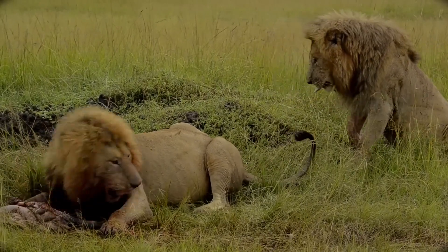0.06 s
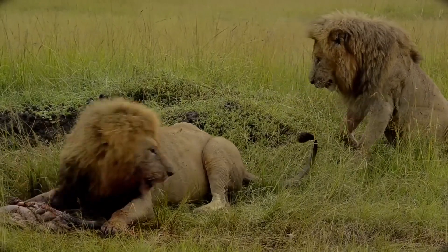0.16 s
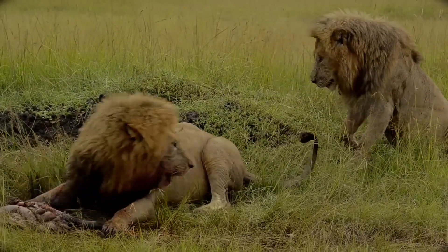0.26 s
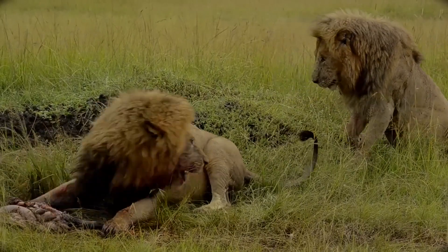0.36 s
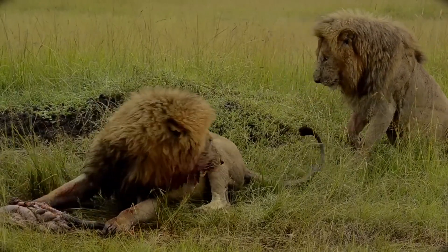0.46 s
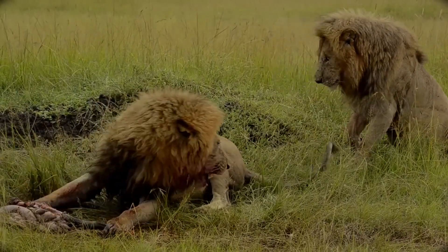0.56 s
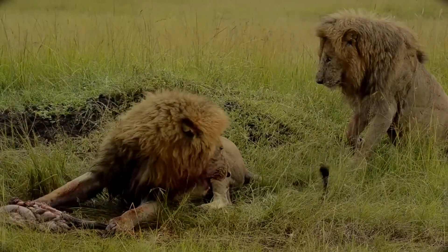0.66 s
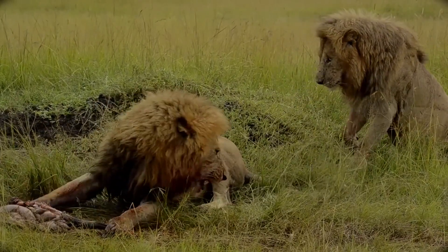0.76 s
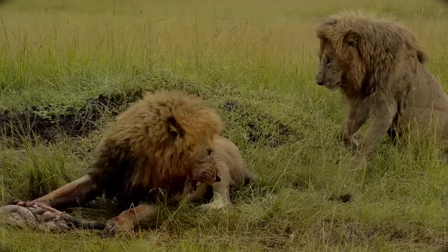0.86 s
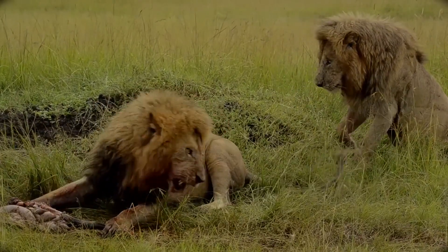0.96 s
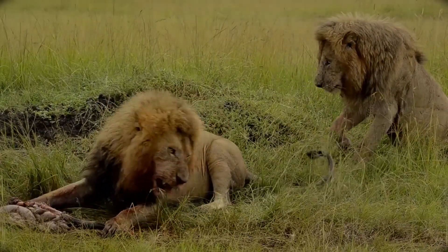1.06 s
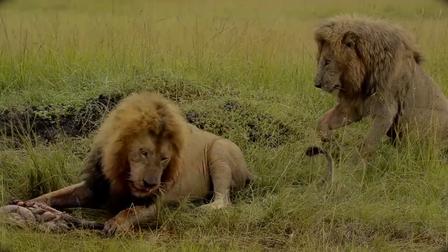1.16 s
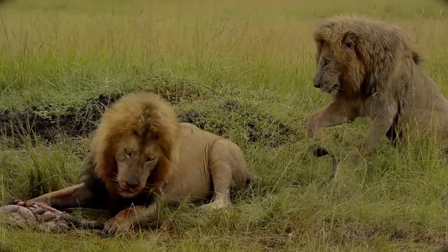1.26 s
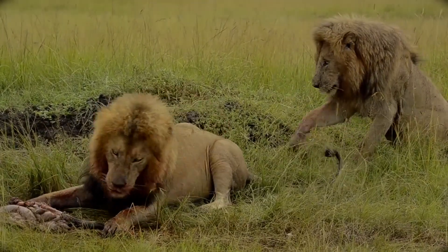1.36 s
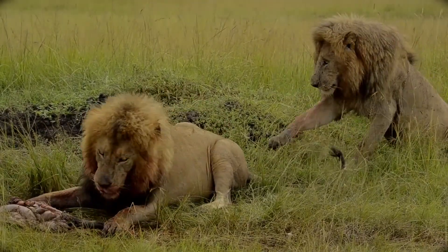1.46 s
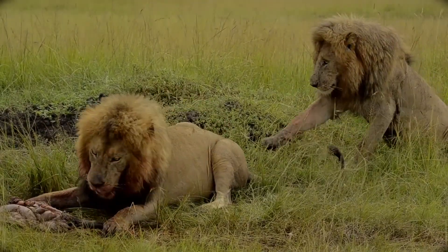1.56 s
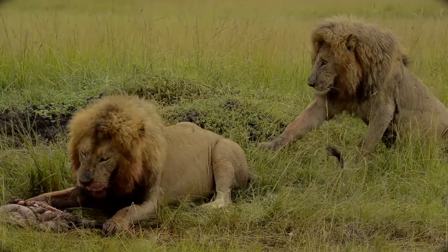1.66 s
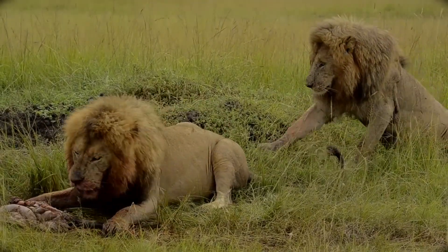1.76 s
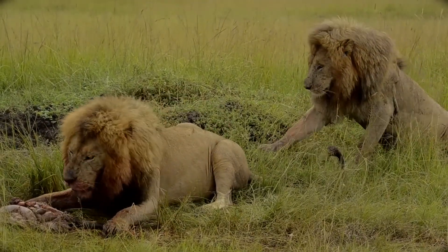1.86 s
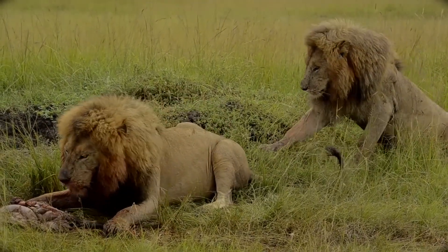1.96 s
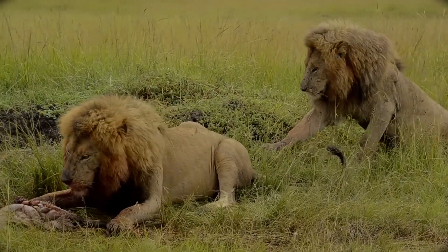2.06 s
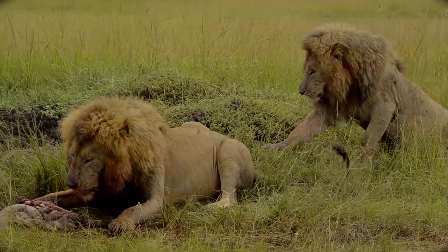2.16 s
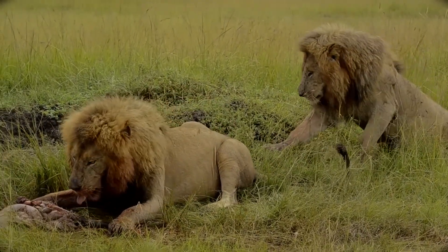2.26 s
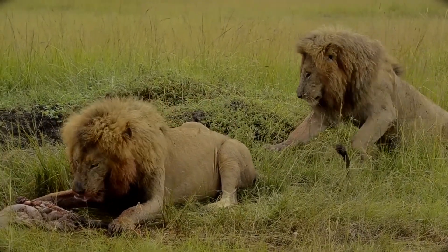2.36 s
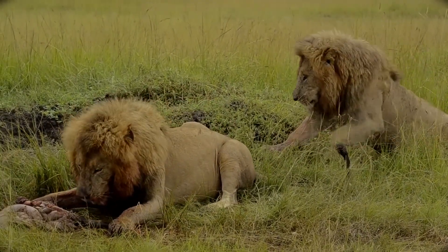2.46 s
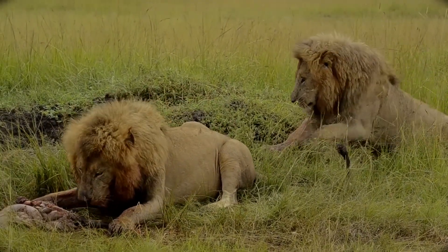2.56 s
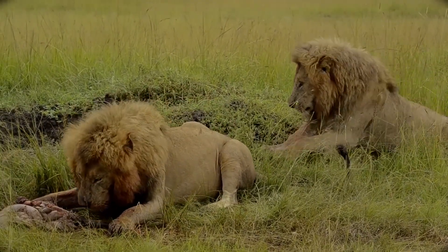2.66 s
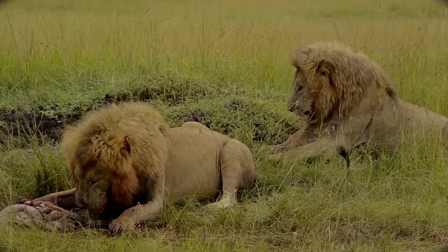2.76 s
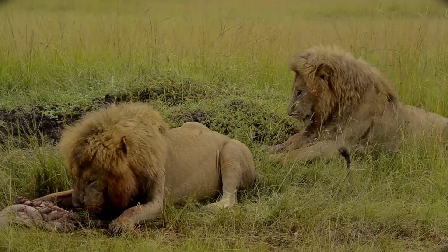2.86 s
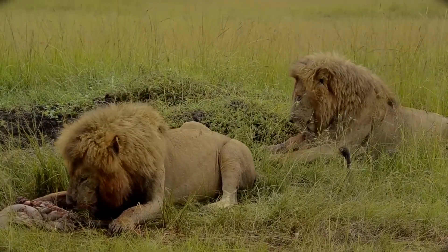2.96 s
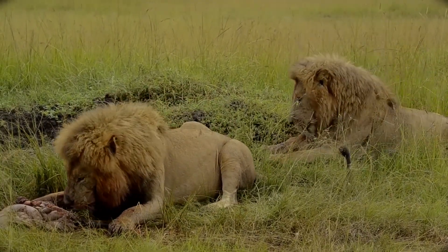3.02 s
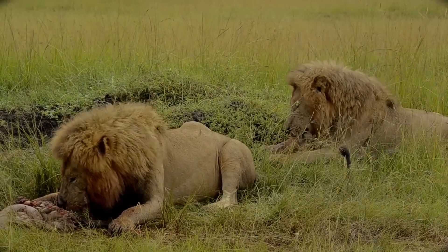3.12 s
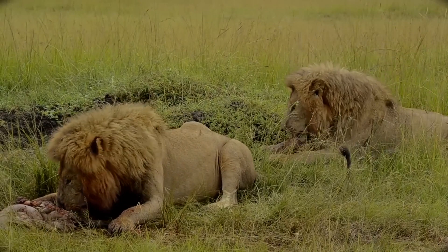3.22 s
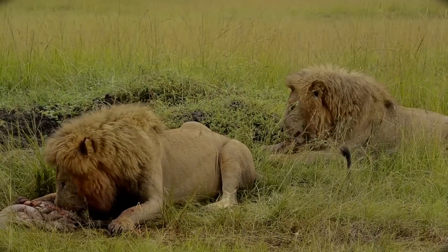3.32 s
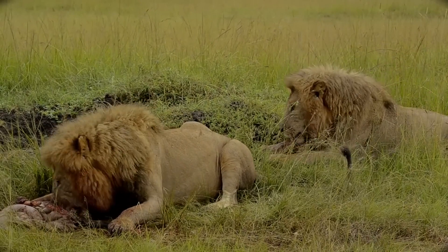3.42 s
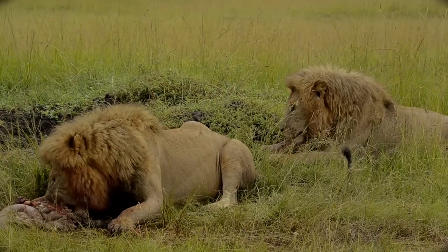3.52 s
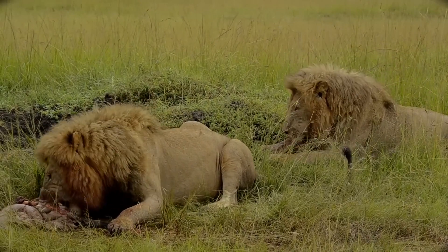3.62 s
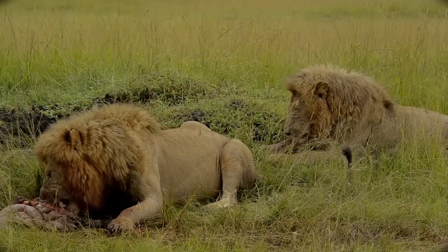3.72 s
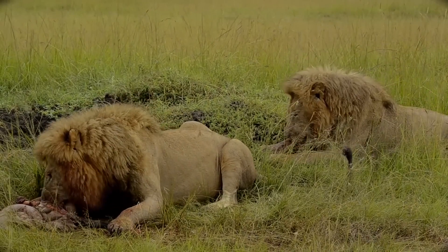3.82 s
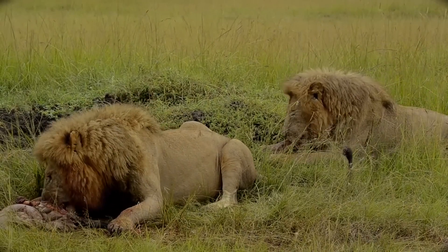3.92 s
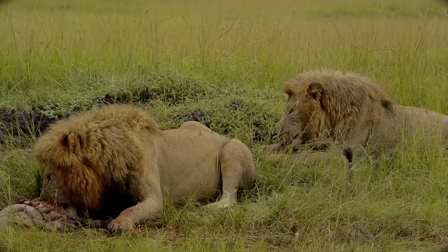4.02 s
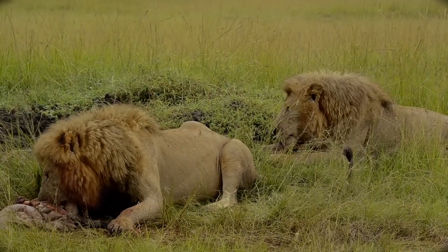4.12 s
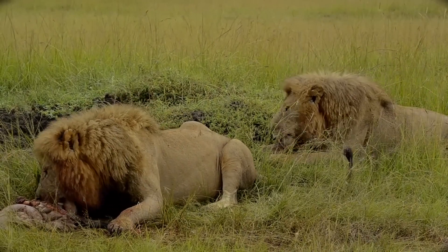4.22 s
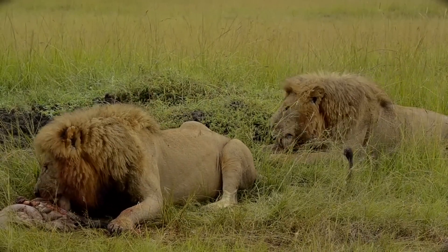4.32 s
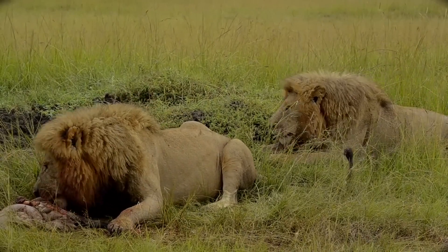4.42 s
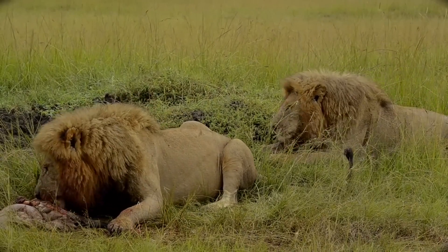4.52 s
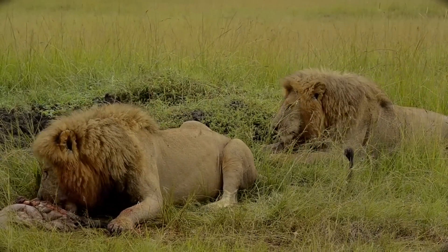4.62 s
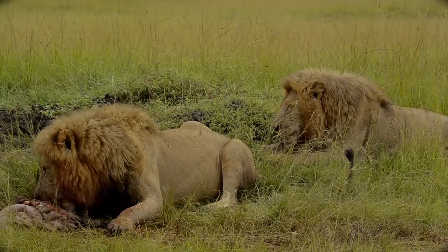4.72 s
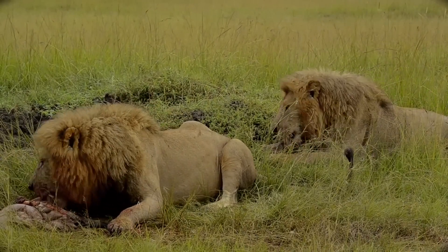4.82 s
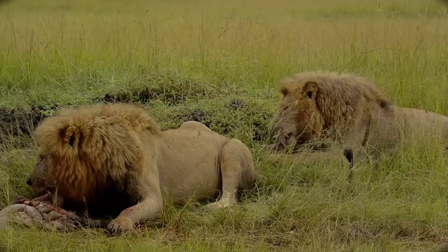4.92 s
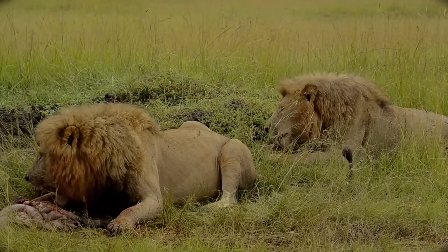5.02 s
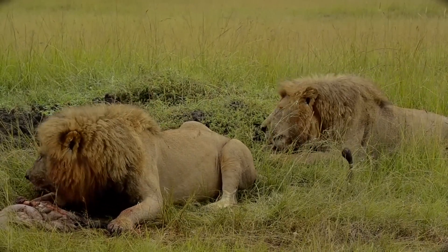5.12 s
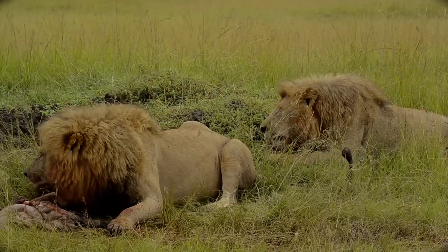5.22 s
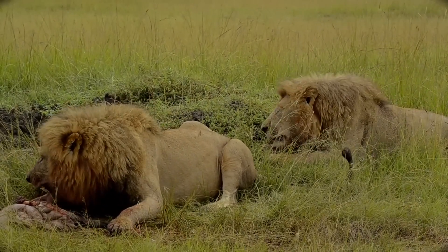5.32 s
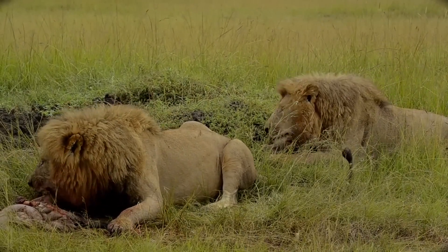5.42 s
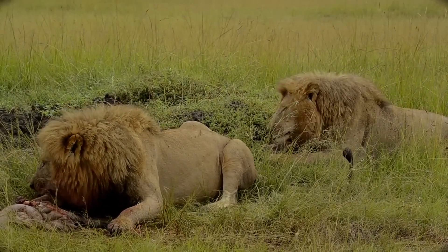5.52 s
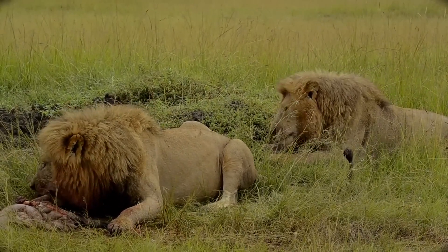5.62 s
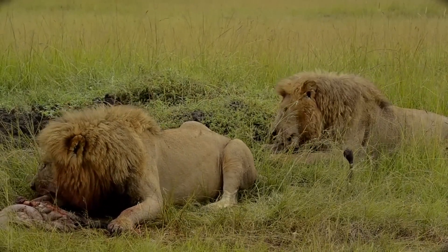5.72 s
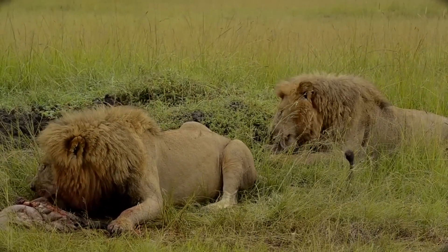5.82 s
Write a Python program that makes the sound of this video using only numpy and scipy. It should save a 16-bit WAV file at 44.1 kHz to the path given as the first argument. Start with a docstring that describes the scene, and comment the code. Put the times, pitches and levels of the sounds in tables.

```python
"""A lion growling over its kill

A lion growls in short bursts in open grassland, some metres away. Its slack vocal folds flap about
17 to 32 times a second, and each flap rings the belly, chest, throat, mouth, nose, palate and teeth.
Its breath adds a low, lumpy rumble. Noise bursts are teeth snapping dry tissue; soft thuds are paws,
jaws and tail on grass and meat. Birds are sliding tones and hoarse noise, insects narrow noise bands,
and the distant rustle of grass and trees is shaped noise."""
import sys
import numpy as np
from scipy import signal
from scipy.io import wavfile
from scipy.ndimage import uniform_filter1d

SR = 44100
rng = np.random.default_rng(int(sys.argv[2]) if len(sys.argv) > 2 else 0)


def generate_wav(sig):
    """Save sig (samples, or channels by samples) to the path in sys.argv[1] as 16-bit PCM at SR."""
    pcm = np.round(np.clip(np.atleast_2d(sig).T, -1, 1) * 32767).astype(np.int16)
    wavfile.write(sys.argv[1], SR, pcm)


N = 259308  # samples in the scene

# fixed rings of the palate, for growls and the pant: (pitch_hz, width_hz, relative level_db)
PALATE_RINGS = [(2480, 100, -1), (2700, 100, 0), (3080, 150, -10), (2200, 200, -12)]


def amp(db):
    """Turns decibels into a plain factor."""
    return 10 ** (np.asarray(db) / 20)


def evened(x):
    """Scales a sound to an average (RMS) strength of 1."""
    return x / np.sqrt(np.mean(x ** 2) + 1e-20)


def add(mix, start_s, sound):
    """Lays a sound into the mix at its start time, cutting what runs past the end."""
    part = mix[round(start_s * SR):][:len(sound)]
    part += sound[:len(part)]


def curves(rows, t):
    """Draws straight lines between rows; the first column is time, each other column a curve."""
    times, *columns = np.transpose(rows)
    return [np.interp(t, times, column) for column in columns]


def bouts(rows, t, slope_db_per_s, rest_db):
    """Level in dB: held through each bout, sloping away on both sides down to a resting level."""
    start, end, db = np.transpose(rows)[:, :, None]
    time_outside = np.maximum(np.maximum(start - t, t - end), 0)
    return np.maximum((db - slope_db_per_s * time_outside).max(0), rest_db)


def resonate(x, hz, *widths):
    """A resonance of gain 1: shifts hz down to zero, smooths once for each width, shifts back."""
    turn = np.exp(2j * np.pi * np.cumsum(hz * np.ones(x.shape[-1])) / SR)
    x = x / turn + 1e-18
    for keep in np.exp(-np.pi * np.abs(widths) / SR):
        x = signal.lfilter([1 - keep], [1, -keep], x)
    return 2 * (turn * x).real


def cavity(x, rings, hz=1, soften=6.4):
    """Rings a hollow at several pitches; wider passes soften the onset and darken the valleys."""
    total = 0
    for k, (pitch, width, db) in enumerate(rings):
        ring = resonate(x, pitch * hz, width, soften * width, 2 * soften * width)
        total = total + (-1) ** k * amp(db) * ring  # every second ring is flipped
    return total


def air():
    """Distant rustle of grass and trees: noise with a set tone colour, in drifting patches."""
    # tone colour of the rustle: (pitch_hz, relative level_db)
    colour = [(15, -36.5), (25, -5.5), (104, -7), (204, -6.5), (339, -4.5), (469, -6.5), (581, -7.5),
              (894, -6), (1140, -7.5), (1750, -7), (1950, -14), (2290, -12.5), (5560, -23), (8790, -29),
              (15500, -40.5)]
    frames, hz = N // 256 + 5, np.fft.rfftfreq(1024, 1 / SR)
    real, imaginary, patches = rng.standard_normal((frames, 513, 3)).T
    patches = uniform_filter1d(patches, 12, 0)  # smooth across pitch
    patches = evened(uniform_filter1d(patches, 10, 1))  # smooth along time
    colour_hz, colour_db = np.transpose(colour)
    level_db = np.interp(np.log(hz + 1), np.log(colour_hz + 1), colour_db)[:, None]
    spectrum = (real + 1j * imaginary) * amp(level_db + 1.8 * patches)
    rustle = signal.istft(spectrum, nperseg=1024, noverlap=768)[1][:N]
    return amp(-60.5) * evened(rustle)


def insects():
    """Narrow bands cut from one noise: some steady, one that sings in bouts."""
    # steady insects: (pitch_hz, width_hz, level_db)
    steady = [(1778, 49, -77.5), (4240, 44, -84), (6310, 114, -85.5), (6540, 200, -85.5),
              (7140, 86.5, -88.5), (8510, 370, -87)]
    # bouts of the singing insect: (start_s, end_s, level_db)
    buzz = [(.26, 1.1, -80.5), (1.9, 2.25, -82.5), (2.7, 3.25, -80), (3.7, 3.98, -80.5),
            (4.28, 4.42, -81.5), (4.75, 5.1, -84)]
    hiss = rng.standard_normal(N)
    level_db = bouts(buzz, np.arange(N) / SR, slope_db_per_s=51.5, rest_db=-97)
    total = amp(level_db) * evened(resonate(hiss, 9085, 180, 180))
    for hz, width, db in steady:
        total = total + amp(db) * evened(resonate(hiss, hz, width, width))
    return total


def slur(start_s, db, from_hz, to_hz, length_s, bend=1.254):
    """A sine that slides quickly, slows towards its end, and swells and fades."""
    u = np.arange(0, length_s, 1 / SR) / length_s  # 0 to 1 along the slur
    hz = to_hz + (from_hz - to_hz) * (1 - u) ** bend
    swell = np.sin(np.pi * u) ** 0.48
    return start_s, amp(db) * np.sin(2 * np.pi * np.cumsum(hz) / SR) * swell


def whistle(db, pitch, hoarse_hz=0, taper=0.17):
    """A held tone; a hoarse one is noise in a narrow resonance. Both ends are tapered."""
    t = np.arange(pitch[0][0], pitch[-1][0], 1 / SR)
    hz = curves(pitch, t)[0]
    tone = np.sin(2 * np.pi * np.cumsum(hz) / SR)
    if hoarse_hz:
        tone = resonate(rng.standard_normal(len(t)), hz, hoarse_hz, hoarse_hz)
    return t[0], amp(db) * evened(tone) * signal.windows.tukey(len(t), taper)


def birds():
    """Several birds: repeated falling notes, quick slurs, whistles and a far, hoarse low call."""
    # one bird repeats three falling notes; its phrases: (start_s, peak level_db)
    phrases = [(1.281, -62), (1.662, -62), (2.386, -56.5), (2.755, -55.5), (3.131, -68), (3.505, -56.5),
               (3.881, -61), (4.25, -61), (4.623, -55), (4.993, -53), (5.365, -56), (5.736, -56)]
    # the three notes: (delay_s, from_hz, to_hz, length_s, level_db over the phrase, bend)
    notes = [(0, 2950, 1900, .014, 0, 1.2), (.051, 2900, 1850, .014, -1, 1.2),
             (.116, 3200, 2270, .024, 0, 2.3)]
    # single slurs of other birds: (start_s, peak level_db, from_hz, to_hz, length_s)
    slurs = [(1.201, -53, 3370, 2250, 0.025), (1.3, -59, 3180, 2400, 0.018),
             (2.671, -56, 2105, 1740, 0.025), (2.687, -64, 7700, 4700, 0.044),
             (3.385, -73, 7700, 4690, .03), (4.042, -65, 7940, 4630, 0.025), (4.3, -65, 2880, 2030, 0.015),
             (4.372, -71, 2900, 2230, 0.0099), (4.477, -62.5, 3130, 2230, .015),
             (4.675, -68.5, 7750, 4900, 0.034), (5.1, -61, 3040, 2750, 0.0063),
             (5.112, -56, 3260, 3120, 0.011), (5.19, -57, 1570, 3060, .012),
             (5.203, -56.5, 3380, 2270, 0.015), (5.283, -59, 1110, 2890, 0.0077),
             (5.294, -58.5, 3550, 2660, 0.0083), (5.558, -58.5, 1300, 2870, 0.026),
             (5.58, -63, 3700, 2270, .018), (5.657, -57.5, 1415, 2800, .012),
             (5.67, -62.5, 3500, 2800, 0.0093)]
    # one row a whistle: (level_db, list of (time_s, pitch_hz))
    whistles = [ (-58.5, [(2.995, 3400), (3.024, 3120), (3.09, 3245), (3.156, 3277), (3.22, 3220),
                (3.29, 3130), (3.308, 2774), (3.32, 2700)]), (-60, [(3.51, 2750), (3.534, 3070),
                (3.57, 2900), (3.604, 2820), (3.664, 2840), (3.698, 2856), (3.735, 3000)]),
                (-75, [(.54, 4000), (.61, 3500), (.7, 3820), (.78, 3700)]), (-74, [(3.425, 3900),
                (3.522, 3680), (3.674, 3850), (3.714, 3672), (3.74, 3700)]), (-71, [(3.0, 4620),
                (3.076, 4730), (3.14, 4600)]), (-74, [(3.16, 4200), (3.22, 4330)]), (-76, [(0, 3050),
                (.05, 2900)]), (-75, [(.18, 4740), (.23, 4650), (.28, 3900)]), (-64.5, [(5.68, 1263),
                (5.744, 1476), (5.77, 1481), (5.822, 1841), (5.865, 1850)]), ]
    # the hoarse low call: (start_s, length_s, pitch_hz, level_db)
    coos = [(2.61, .07, 846, -63.5), (3.4, 0.4, 864, -68), (3.79, 0.056, 850, -63),
            (4.2, 0.083, 850, -62.5), (4.58, .12, 886, -65.5), (5.38, .07, 838, -62.5)]
    mix = np.zeros(N)
    for start, db in phrases:
        for delay, from_hz, to_hz, length, note_db, bend in notes:
            add(mix, *slur(start + delay, db + note_db, from_hz, to_hz, length, bend))
    for row in slurs:
        add(mix, *slur(*row))
    for row in whistles:
        add(mix, *whistle(*row))
    for start, length, hz, db in coos:
        pitch = [(start, hz), (start + length, hz)]
        add(mix, *whistle(db, pitch, hoarse_hz=76, taper=0.33))
    return mix


def thud(start_s, db, hz, t60_s):
    """A soft push that rings briefly, with a quick rustle on top."""
    t = np.arange(4000) / SR
    rustle = evened(resonate(rng.standard_normal(4000), 600, 900, 900)) * amp(-60 * t / 0.0067)
    push = np.sin(2 * np.pi * hz * t) + .38 * rustle
    return start_s, amp(db - 60 * t / t60_s + 2.5) * push * np.minimum(t / .001, 1)


def snap(start_s, db, hz, width_hz, t60_s):
    """Dry tissue snaps: a sharp burst of noise that dies away, coloured by one broad ring."""
    t = np.arange(1500) / SR
    burst = rng.standard_normal(1500) * amp(-60 * t / t60_s) * np.minimum(t / 0.00018, 1)
    burst = cavity(burst, [(hz, width_hz, 0)], soften=0.63)
    return start_s, amp(db) * burst / abs(burst).max()


def teeth_snaps():
    """Teeth snap dry tissue; the highest treble is softened."""
    # snaps: (start_s, peak level_db before softening, centre pitch_hz, width_hz, t60_s to fall 60 dB)
    snaps = [(2.1164, -22, 2470, 3600, 0.0056), (2.1204, -25.5, 1550, 1500, 0.0043),
             (2.122, -41, 4000, 5000, 0.0087), (2.1268, -44.5, 8200, 2500, 0.0062),
             (2.1319, -34, 3420, 4000, 0.015), (2.138, -49, 7500, 4000, 0.0054),
             (2.1422, -45, 6500, 5000, 0.01), (2.152, -43, 5000, 6000, 0.0082),
             (2.1694, -41.5, 2670, 2500, 0.04), (2.1729, -33.5, 5850, 6100, 0.0026),
             (2.177, -36.5, 2670, 3500, 0.012), (2.629, -49.5, 3040, 3030, 0.018),
             (3.761, -47, 4440, 1590, .014), (4.227, -53, 3300, 1480, .012),
             (4.236, -52.5, 3100, 1220, 0.018)]
    mix = np.zeros(N)
    for row in snaps:
        add(mix, *snap(*row))
    return signal.lfilter(*signal.butter(2, 12500, fs=SR), mix)


def breath_rumble():
    """Low, lumpy rumble of the lion's breath: low noise whose strength is uneven."""
    # rumbles: (start_s, end_s, level_db)
    rumbles = [(0, .01, -42.5), (.1, 1.05, -52.5), (2.0, 2.03, -55), (3.05, 3.13, -50.5),
               (4.9, 4.95, -51.5)]
    lump_noise, hiss = rng.standard_normal((2, N))
    smooth = uniform_filter1d(uniform_filter1d(lump_noise, 1500), 1500)
    lumps = amp(4.2 * evened(smooth))
    rumble = evened(lumps * evened(resonate(hiss, 49, 84, 84)))
    level_db = bouts(rumbles, np.arange(N) / SR, slope_db_per_s=78.5, rest_db=-73)
    return amp(level_db) * rumble


def pant(start_s, peak_s, end_s):
    """One swelling breath: noise through the open mouth."""
    t = np.arange(start_s, end_s, 1 / SR)
    breath = cavity(rng.standard_normal(len(t)), PALATE_RINGS)
    swell_db = np.interp(t, [start_s, peak_s, end_s], [-19, 0, -15])
    return start_s, amp(-55 + swell_db) * evened(breath)


def growl(rows, flaps, posture):
    """Each flap slaps, rebounds, spits air and leaves a dying puff; each cavity rings at its own level."""
    # rings of moving cavities: (factor on the cavity's pitch, width_hz, relative level_db)
    chest_rings = [(0.97, 33.3, 5), (2.2, 117.2, -11.5)]
    throat_rings = [(1.018, 52, 7), (0.865, 64, -5), (1.13, 14, -8.5)]
    mouth_rings = [(0.9985, 48, 6), (1.229, 42, -1), (0.67, 43, -11.5), (1.42, 62, -4.5)]
    nose_rings = [(1.004, 142, 2.5), (0.723, 49, -10), (1.405, 210, -13.5)]
    # rings of fixed cavities: (pitch_hz, width_hz, relative level_db)
    belly_rings = [(95, 17, 4.5), (174.2, 24, -12), (318.8, 66, -0.5)]
    teeth_rings = [(3460, 370, 1), (4215, 392, -16), (4890, 760, -5.5), (6820, 1300, -17),
                   (7520, 1100, -16), (9700, 2300, -19)]
    onset_s, release_s = .02, .04  # added before the first row and after the last
    start, end = rows[0][0] - onset_s, rows[-1][0] + release_s
    t = np.arange(start, end + 0.029, 1 / SR)

    # count the flaps, then mark the moments of slaps and rebounds
    turns = np.cumsum(curves(flaps, t)[0] * (t > flaps[0][0] + .0008)) / SR
    going = t < flaps[-1][0]
    slaps = np.diff(np.ceil(turns) * going, prepend=0) > 0
    rebounds = np.diff(np.floor(turns + .55) * going, prepend=0) > 0
    hiss = rng.standard_normal(len(t))
    phase = turns % 1  # 0 to 1 through each flap
    since = phase / 0.077
    spits = evened(since * np.exp(-since) * going * hiss)
    puffs = evened((0.56 + np.exp(-phase / 0.26)) * hiss)

    # levels and pitches as the growl goes on
    effort, jaw, upper, nasal, breathy = curves(rows, t)
    chest = effort + np.interp(t, [start, rows[0][0], rows[-1][0], end], [-26.5, 0, 0, -6])
    chest_hz, mouth_hz, nose_hz, palate, teeth = (
        np.interp(t, np.linspace(start, end, np.size(glide)), np.ravel(glide)) for glide in posture)
    throat_hz = 447 + 5 * np.clip(jaw, -9.5, 9.5)  # the throat rises as the jaw opens
    upper, nasal = chest + upper, nasal / 2  # half goes to the nose, half comes off the mouth
    fade = np.clip((end - t) / 0.031, 0, 1)

    # air noise and rebounds reach the upper cavities more:
    # (rings, level_db, pitch_hz or factor 1, softening, extra breath, rebound, spit 0-1)
    cavities = [
        (belly_rings, chest - 7, 1, 9., -.2, .05, 0),
        (chest_rings, chest, chest_hz, 11., -.15, .1, 0),
        (throat_rings, chest + jaw, throat_hz, 2.6, -.25, .1, 0),
        (mouth_rings, upper - nasal, mouth_hz, 5., -.12, .15, 0),
        (nose_rings, upper + nasal, nose_hz, 4., 0., .45, .2),
        (PALATE_RINGS, upper + palate, 1, 4., .3, .3, .8),
        (teeth_rings, upper + teeth, 1, 3., .45, .3, .95)]
    out = 0
    for rings, db, hz, soften, more, rebound, spit in cavities:
        breath_share = np.clip(breathy + more, .01, 1)
        uneven = amp(.8 * rng.standard_normal(len(t)))  # slaps differ in strength
        clicks = evened((slaps + rebound * rebounds) * uneven)
        pulses = np.sqrt(1 - spit) * clicks + np.sqrt(spit) * spits
        drive = np.sqrt(1 - breath_share) * pulses + np.sqrt(breath_share) * puffs
        # the plain version, without level changes, sets the loudness
        plain, played = cavity(np.array([drive, drive * amp(db) * fade]), rings, hz, soften)
        out = out - played / np.sqrt(np.mean(plain ** 2))
    return t[0], out


def lion():
    """The pant, growls and thuds together, dulled by distance and grass and thinned in the bass."""
    # the pant: (start_s, peak_s, end_s)
    breath_times = (.12, .286, .33)
    # one table a growl, the first row is the first flap: (time_s, flaps_per_s)
    flap_rates = [
        [(0.4375, 29.02), (0.52, 31.51), (0.7, 27.1), (1.0, 27.61), (1.11, 25.04), (1.2, 27.58), (1.3, 18.2)],
        [(1.62, 24.33), (1.727, 28.87)],
        [(1.8348, 31.76), (1.9299, 26.41), (2.0249, 24.53), (2.1199, 23.71), (2.215, 22.79)],
        [(2.8585, 30.75), (2.9646, 22.91), (3.0707, 23.92), (3.1769, 27.5), (3.283, 21.73)],
        [(3.85, 27.52), (3.954, 31.34), (4.058, 17.1)],
        [(4.693, 23.88), (4.8062, 23.67), (4.9194, 23.38), (5.0326, 23.76), (5.1458, 26.85), (5.259, 22.71)],
    ]
    # one table a growl: (time_s, effort level_db, throat over chest_db, upper cavities over chest_db,
    # nose over mouth_db, breathiness 0-1)
    efforts = [
        [(.438, -39, -4, -31.5, -12, 0.73), (.504, -37.5, 5, -20.5, 6, 0.55),
         (.568, -37.5, 9.5, -17.5, 20.5, 0.77), (.66, -39.5, 8, -19.5, -4, .25),
         (.782, -42, 10, -17.5, 6.5, 0.4), (.95, -39, 11.5, -16, -3, .15),
         (1.076, -40.5, 5.5, -21.5, -3.5, 0.46), (1.12, -41, 7.5, -22, -6, 0.43),
         (1.165, -35.5, 6.5, -19.5, -11, 0.41), (1.2, -39.5, 4, -17.5, -13, 0.3),
         (1.24, -43.5, -1.5, -19, -5, 0.3), (1.31, -47.5, -12.5, -30, -10, .14)],
        [(1.62, -64, -2, -1, 11, 1), (1.66, -53, 1.5, -3, 10, 1), (1.697, -44.5, -2, -1.5, 4, 0.98),
         (1.74, -71, 5, -8, -5, 0.6)],
        [(1.835, -35, 5.5, -13, -25.5, 0.42), (1.867, -31, 10, -3.5, -14, 0.22),
         (1.905, -30, -4.5, -6, -2, 0.57), (1.939, -47, 7, 6, 4, 1), (2.017, -47.5, 0.5, -2.5, 12.5, 0.76),
         (2.1, -42.5, -6, -7, 1, 0.57), (2.185, -45, -15, -15.5, -3.5, 0.88), (2.23, -61, -18, -18, 2, 0.8)],
        [(2.858, -41.5, 0, -11.5, -10, 0.52), (2.895, -36.5, -7.5, -9, 2.5, 0.65),
         (2.95, -40, -9, -6.5, 8.5, 0.56), (3.014, -56, -3, 3, 11, 0.8), (3.098, -42.5, -12.5, -1, -2, 0.46),
         (3.175, -42.5, -20, -3.5, -10, 0.24), (3.253, -49, -30, -11.5, 4, 0.5), (3.3, -59, -37, -43, 1, .17)],
        [(3.85, -60.5, -10, -9.5, 4, .7), (3.919, -44.5, -8.5, -15.5, -2, 0.8),
         (3.952, -44.5, -8, -15, -23.5, 0.53), (3.986, -48, -18, -23.5, -24, .6), (4.05, -71, -2, -28, 0, 0.7)],
        [(4.693, -52, -12.5, -15, -12, 0.87), (4.78, -58, -0.5, -5, -16, 1), (4.866, -59, -4, -0.5, 3, 0.9),
         (4.97, -52, 0.5, -8, 4, 0.62), (5.04, -51, -6.5, -10, 10, .65), (5.113, -38, -17, -23.5, 9, 0.53),
         (5.189, -42, -24, -34, -16, 0.4), (5.25, -73, -9, -24, 0, .09)],
    ]
    # one row a growl, lists glide from start to end: (chest pitch_hz, mouth pitch_hz, nose pitch_hz,
    # palate over upper cavities_db, teeth over upper cavities_db)
    postures = [((123, 150, 121), 835, (1187, 1334), (5.5, 8.3, 6.7), (2.2, -7, -10.5)), ((190, 144, 140),
                800, (1190, 1250), (-1, -18), (-11, -20)), ((148, 102, 100), 751, (1306, 1310),
                (3.2, -1, -9), (-14, -13, -16)), ((127, 102, 92), 760, (1340, 1320), (-20, -17.5, 1),
                (-13.5, -21, -38)), ((87, 128, 110), 770, (1290, 1470), (-1, -12), (0, -6)),
                ((147, 140, 151), 845, (1365, 1340), (-5.5, -5), (-13, -13))]
    # paws, jaws and tail on grass and meat: (start_s, level_db before a 2.5 dB lift, pitch_hz,
    # t60_s to fall 60 dB)
    thuds = [(0.013, -60, 91.5, 0.09), (0.034, -32, 93, 0.073), (0.079, -48, 51.1, 0.036),
             (0.189, -43.5, 118, 0.045), (0.24, -37.5, 51.1, 0.062), (0.269, -40, 63, 0.025),
             (0.362, -43, 326, 0.06), (0.378, -30, 110, 0.016), (2.701, -53, 407, 0.16),
             (3.765, -52, 181, 0.066), (4.183, -41, 112, 0.037), (4.549, -49, 121, 0.034),
             (5.397, -48, 518, 0.063), (5.519, -55.5, 115, 0.057), (5.689, -53, 207, 0.038),
             (5.781, -34, 109, 0.0092)]
    mix = np.zeros(N)
    add(mix, *pant(*breath_times))
    for parts in zip(efforts, flap_rates, postures):
        add(mix, *growl(*parts))
    for row in thuds:
        add(mix, *thud(*row))
    mix = signal.lfilter(*signal.butter(3, 9070, fs=SR), mix)  # fades above this Hz
    return signal.lfilter(*signal.butter(3, 64.6, "high", fs=SR), mix)  # and below this Hz


def scene():
    """All sources on one channel."""
    return (air() + insects() + birds() + teeth_snaps() + breath_rumble() + lion())[None]


def record(dry):
    """The microphone housing dips a few pitches, then the highest treble is cut off."""
    # dips of the housing: (pitch_hz, width_hz, depth 0-1)
    dips = [(5680, 390, 0.85), (6960, 160, 1), (1010, 103, 0.46)]
    x = dry[0]
    for hz, width, depth in dips:
        x = x - depth * resonate(x, hz, width)
    low_pass = signal.firwin(511, 15650, window=("kaiser", 9), fs=SR)
    return signal.oaconvolve(x, low_pass, "same")[None]


dry = scene()
out = record(dry)
generate_wav(out)
```